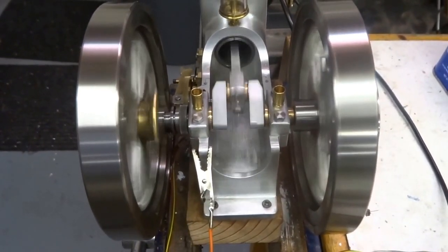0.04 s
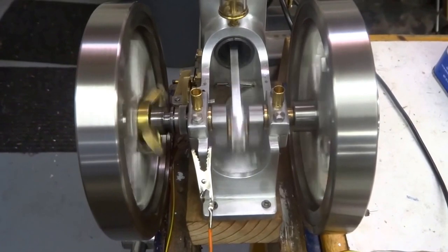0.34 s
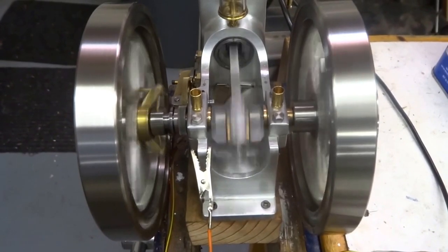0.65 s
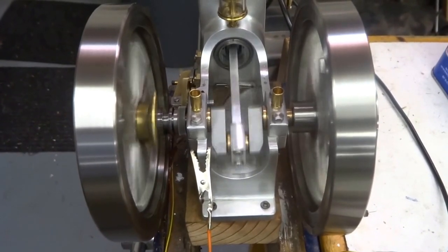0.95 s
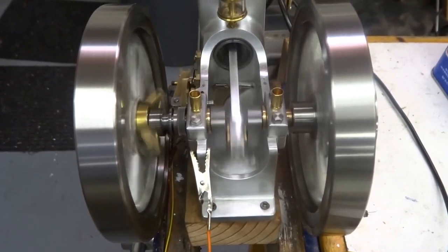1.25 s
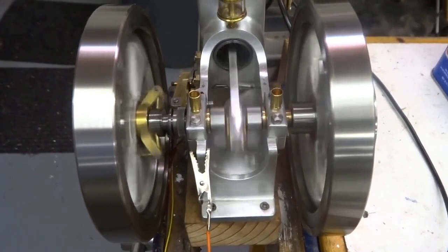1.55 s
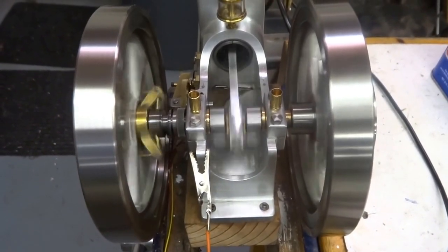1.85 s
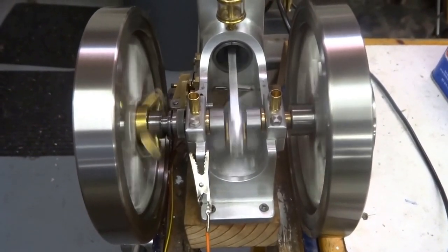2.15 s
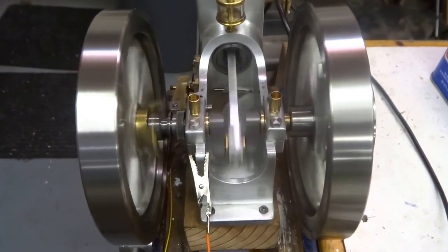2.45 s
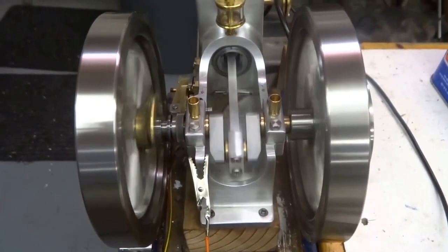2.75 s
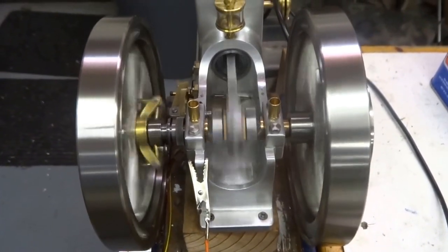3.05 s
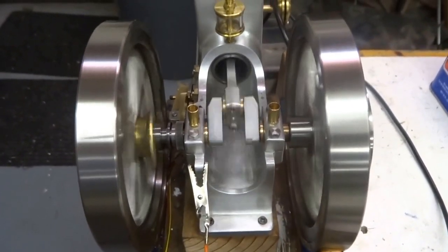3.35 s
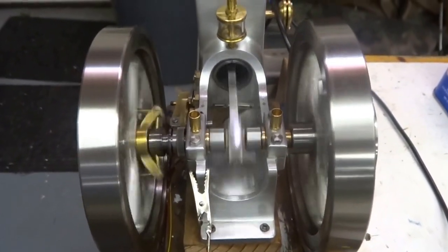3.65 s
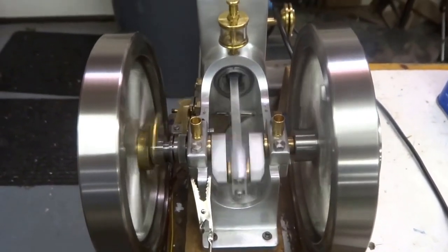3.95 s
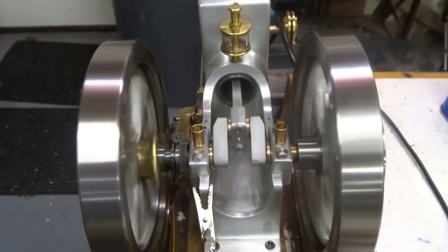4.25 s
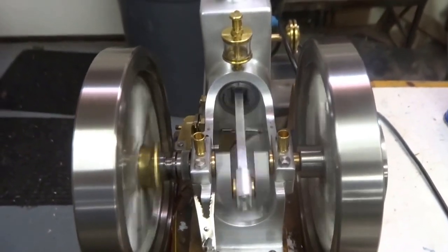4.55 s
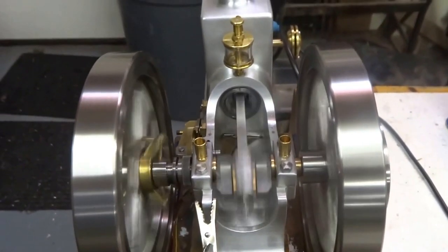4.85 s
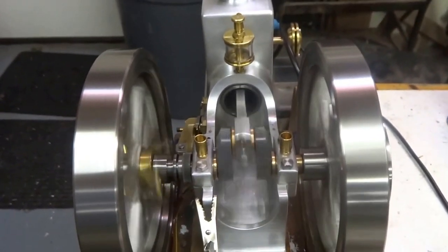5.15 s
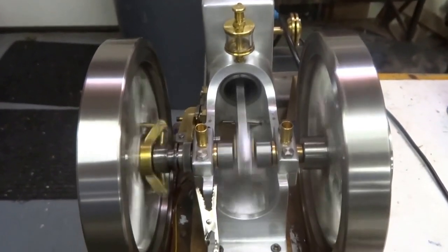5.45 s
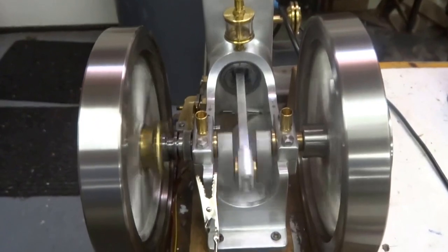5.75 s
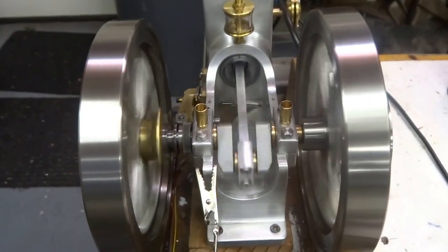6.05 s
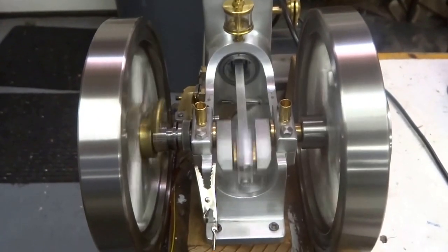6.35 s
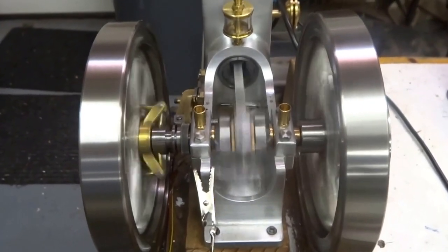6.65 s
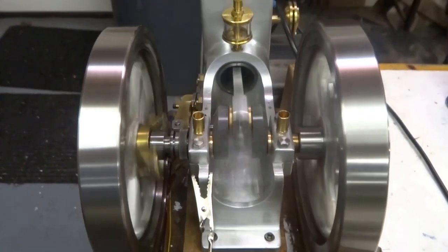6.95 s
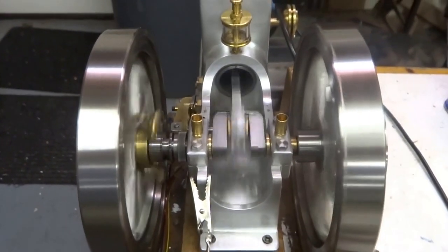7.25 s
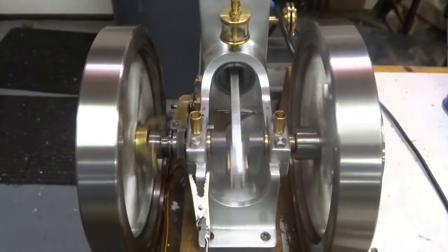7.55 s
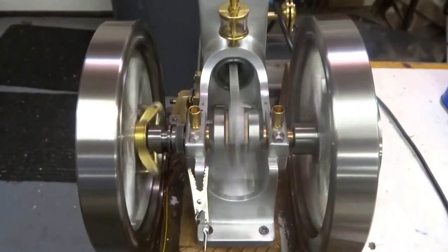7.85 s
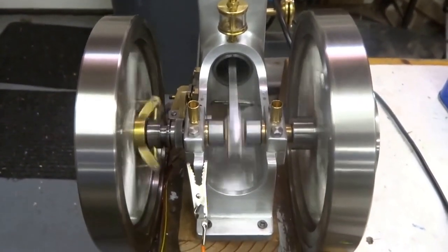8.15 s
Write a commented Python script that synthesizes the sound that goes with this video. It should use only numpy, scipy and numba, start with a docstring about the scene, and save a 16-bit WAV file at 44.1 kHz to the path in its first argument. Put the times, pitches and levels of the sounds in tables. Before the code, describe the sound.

Fast, steady metal clatter and pulsing air from a model flywheel engine, broken by occasional sucking hisses, chuffs and soft misfires.

```python
"""A small hit-and-miss model engine turns about 13 times a second, close up in a workshop.
At 0.6 s its mixer sucks with a hiss and it fires with a chuff. Then it coasts, exhaust valve held open:
the piston pumps air that whistles in and out, and loose metal parts clatter. At 4 s the wooden base
takes a dull blow; the slowed engine misfires twice, then fires at 4.6 s and 5.7 s. It coasts again and
ends on three misfires near 8 s. Each time the valve shuts for an intake, whistle and clatter duck."""
import sys
import numpy as np
from scipy import signal
from scipy.fft import rfft, irfft
from scipy.io import wavfile
from scipy.ndimage import uniform_filter1d
from numba import njit

SR = 44100
rng = np.random.default_rng(int(sys.argv[2]) if len(sys.argv) > 2 else 0)


def wrap_up_sound(samples):
    """Save the sound to the file named by the first command line argument, as 16-bit audio."""
    columns = np.atleast_2d(samples).T
    # keep every value between -1 and 1, then stretch to whole-number steps
    tamed = np.clip(columns, -1, 1)
    steps = np.round(tamed * 32767).astype(np.int16)
    wavfile.write(sys.argv[1], SR, steps)


N = 365588
T = np.arange(N) / SR


def undb(db):
    """Decibels to gain."""
    return 10 ** (np.asarray(db) / 20)


def noise():
    """White noise of unit power."""
    return rng.standard_normal(N)


def unit(x):
    """Scale to unit power."""
    return x / np.sqrt(np.mean(x ** 2))


def through(x, response):
    """Pass a sound through a response scaled to unit energy."""
    return signal.fftconvolve(x, response / np.linalg.norm(response))[:N]


def colour(x, spectrum, size=4096):
    """Minimum-phase EQ; the curve sets the tone, not the overall level."""
    hz, db = np.transpose(spectrum)
    log_hz = np.log(np.maximum(np.arange(size // 2 + 1) * SR / size, 1))
    cepstrum = irfft(np.log(undb(np.interp(log_hz, np.log(hz), db))))
    cepstrum[1:size // 2] *= 2
    cepstrum[size // 2 + 1:] = 0
    return through(x, irfft(np.exp(rfft(cepstrum))))


def ring(x, modes, size=6000):
    """Excite a set of decaying modes; the narrow ones ring longest."""
    t = T[:size]
    response = sum((-1) ** k * undb(db) * width * np.exp(-np.pi * width * t) * np.sin(2 * np.pi * hz * t)
                   for k, (hz, width, db) in enumerate(modes))
    return through(x, response)


def bursts(times, dbs, rise, hold, t60, size=16000):
    """Envelope of bursts that rise, hold and die away, timed in seconds."""
    t, envelope = T[:size], np.zeros(N + size)
    for start, db, held in np.broadcast(times, dbs, hold):
        i = int(np.clip(start * SR, 0, N))
        decay = np.exp(-np.log(1000) * np.maximum(t - held, 0) / t60)
        envelope[i:i + size] += undb(db) * np.minimum(t / rise, 1) * decay
    return envelope[:N]


def wander(rate_hz):
    """Smooth, bounded random drift with a spread near 1."""
    step = max(int(SR / rate_hz), 1)
    stairs = np.repeat(rng.standard_normal(N // step + 1), step)
    return 2 * np.tanh(unit(uniform_filter1d(stairs, step)[:N]) / 2)


def gate(spans):
    """Soft-edged gate, 1 from each start to its end in seconds."""
    return uniform_filter1d(sum(1. * ((T > start) & (T < end)) for start, end in spans), size=400)


@njit
def bandpass(x, hz, width):
    """Band-pass whose centre moves."""
    y, band_state, low_state = np.empty(len(x)), 0., 0.
    for i in range(len(x)):
        g, damping = np.tan(np.pi * hz[i] / SR), width / hz[i]
        band = (band_state + g * (x[i] - low_state)) / (1 + g * (g + damping))
        band_state, low_state = 2 * band - band_state, low_state + 2 * g * band
        y[i] = damping * band
    return y


def whistle(hz, width_hz):
    """Noise that sings in a narrow, moving resonance."""
    breathy = bandpass(noise(), hz, float(width_hz))
    return unit(bandpass(breathy, hz, float(width_hz)))


def pan(x, right_db):
    """Place a sound in stereo, the right side louder by right_db."""
    return x * undb(np.array([[-1], [1]]) * right_db / 2)


def reflections(x, t60=0.065, size=16000):
    """A short diffuse tail, different at each ear."""
    t = T[:size]
    tail = np.minimum(t / 0.0019, 1) * np.exp(-np.log(1000) * t / t60)
    return np.array([through(x, rng.standard_normal(size) * tail) for _ in range(2)])


# The tone of the walls. Each row: frequency in Hz, relative level in dB.
WALL_EQ = [(100, -5), (450, 7.5), (1100, 10), (2000, -1), (4500, 10), (8000, 3.5), (13000, -12)]
def workshop(engine, air):
    """A tight room: the walls colour the engine's reflections and return its whistle plain."""
    return undb(-17) * reflections(colour(engine, WALL_EQ)) + undb(-19) * reflections(air.mean(axis=0))


# The tones of the base's drone and of a blow on it. Each row: frequency in Hz, relative level in dB.
DRONE_EQ = [(25, -45), (60, -15), (105, -13), (138, -1), (185, -6.5), (300, -12), (500, -6.5), (900, -7.5),
            (3000, -9.5), (14000, -23)]
BUMP_EQ = [(100, -12), (300, -3), (800, 0), (1300, -4), (3000, -15), (12000, -26)]
def wooden_base(bump_s=4.002, bump_db=-20.5):
    """The wooden base drones along and takes one dull blow."""
    blow = noise() * bursts([bump_s], bump_db, rise=0.00022, hold=0.0012, t60=0.028)
    drone = colour(noise(), DRONE_EQ) * undb(-40 + 3.4 * wander(11))
    return drone + colour(blow, BUMP_EQ)


def squeak(turns, at_turn=0.7, half_width_turns=0.07):
    """A sliding part chirps faintly at the same place in every turn."""
    offset = (turns - at_turn + .5) % 1 - .5
    swell = np.exp(-(offset / half_width_turns) ** 2)
    return whistle(hz=7700 * (1 + 0.008 * wander(40)), width_hz=450) * swell * undb(-41)


# Firings push the tempo, misfires drag it. Each row: time in seconds, speed change in turns a second.
SPEED_KICKS = [(0.719, 1.918), (4.264, -0.1585), (4.434, -0.1585), (4.61, 1.305), (5.736, 1.21),
               (7.932, -0.1585), (8.101, -0.1585)]
def flywheels(start_turns=0.6126, start_speed=12.4554, friction=0.5627):
    """Speed in turns a second and angle in turns: friction slows the wheels, firings kick them on."""
    speed = start_speed - friction * T + sum(kick * (T > time) for time, kick in SPEED_KICKS)
    return speed, start_turns + np.cumsum(speed) / SR


# The two notes of the open port. Each row: pitch in Hz, width in Hz, pitch rise at full flow in Hz,
# outward level in dB, inward level in dB, pan to the right in dB.
PORT_NOTES = [(4420, 545, 71, -25.5, -32, 4.5), (2856, 396, 190, -32, -26, 0.5)]
def pumping(turns, dead_centre_turns=0.616, flow_power=1.7, leak=0.052):
    """The piston pumps air through the open valve: the high note leads going out, the low coming in."""
    piston_speed = np.sin(2 * np.pi * (turns - dead_centre_turns))
    flow = np.abs(piston_speed)
    outward = (1 + np.tanh(4 * piston_speed)) / 2
    air = 0
    for hz, width, rise_hz, out_db, in_db, right_db in PORT_NOTES:
        note = whistle((hz + rise_hz * flow) * (1 + 0.013 * wander(40)), width)
        db = in_db + (out_db - in_db) * outward + 1.24 * wander(13) + 1.0 * wander(300)
        air = air + pan(note * (leak + flow ** flow_power) * undb(db), right_db)
    return air


# Where parts slide in the cam round, which lasts two turns. Each row: angle in turns,
# half width in turns, bright rattle in dB, frame rattle in dB.
SLIDE_SWELLS = [(0.07, 0.099, -33, -37), (0.91, 0.23, -28, -33.5), (1.1, 0.1, -37.5, -30.5),
                (1.66, 0.17, -59, -36.5), (1.87, 0.15, -26, -28)]
def sliding(turns, bright_floor_db=-39.5, frame_floor_db=-40):
    """Gains of the bright rattle and the frame rattle: a steady bed that swells where parts slide."""
    bright_power, frame_power = undb(bright_floor_db) ** 2, undb(frame_floor_db) ** 2
    for angle, half_width, bright_db, frame_db in SLIDE_SWELLS:
        offset = (turns - angle + 1) % 2 - 1
        swell = np.exp(-(offset / half_width) ** 2)
        bright_power = bright_power + swell * undb(bright_db) ** 2
        frame_power = frame_power + swell * undb(frame_db) ** 2
    return np.sqrt([bright_power, frame_power])


# The groove of rod, cam and latch in each cam round. Each row: angle in turns, scatter in turns,
# chance from 0 to 1, chatter length in seconds, bright contact in dB, frame in dB, own note in Hz.
CAM_KNOCKS = [(0.03, 0.0087, 0.5, 0.0094, -21.5, -32.5, 1400),
              (0.105, 0.0106, 0.75, 0.003, -27.5, -25, 1790), (0.18, 0.013, 0.4, 0.011, -30, -25, 1600),
              (0.335, 0.008, 0.25, 0.0024, -28, -34, 1800), (0.42, 0.0055, 0.8, 0.003, -33.5, -24, 1600),
              (0.79, 0.044, 0.9, 0.004, -28, -35, 1400), (0.93, 0.03, 0.45, 0.0097, -24.5, -28.5, 1400),
              (0.99, 0.019, 0.55, 0.0015, -25, -37, 1460), (1.035, 0.008, 0.75, 0.0018, -24, -31, 2660),
              (1.10, 0.0072, 0.9, 0.004, -27.5, -24, 1910), (1.225, 0.021, 0.45, 0.0097, -25, -30.5, 1660),
              (1.33, 0.063, 0.4, 0.0094, -25, -26, 1570), (1.42, 0.0033, 0.8, 0.003, -34, -35, 1620),
              (1.592, 0.0017, 1, 0.0025, -29, -26, 2840), (1.91, 0.0064, 1, 0.0025, -22, -30.5, 2360),
              (1.975, 0.011, 0.6, 0.001, -37, -18, 1310)]
# The accents, as the rod's play is taken up at once or the latch drops.
# Each row: start in seconds, length in seconds, bright contact in dB, frame in dB.
HARD_CLACKS = [(0.186, 0.0056, -17, -35), (0.199, 0.0034, -20, -17), (0.432, 0.013, -20, -21),
               (0.597, 0.013, -20.5, -22.5), (0.825, 0.0024, -20, -21.5), (0.967, 0.016, -18, -27),
               (1.1, 0.0035, -22, -24), (1.112, 0.024, -20, -25), (1.197, 0.004, -19, -22),
               (1.268, 0.0044, -19, -26), (1.405, 0.0087, -17, -25), (1.703, 0.011, -17, -23.5),
               (1.842, 0.0036, -31, -32), (2.08, 0.0074, -20, -23), (2.168, 0.0032, -16, -21),
               (2.301, 0.017, -17.5, -30), (2.387, 0.021, -19, -22.5), (2.474, 0.0069, -19, -21.5),
               (2.597, 0.003, -18, -23), (2.707, 0.0025, -16, -14), (2.864, 0.011, -18.5, -20.5),
               (3.085, 0.015, -22.5, -28), (3.165, 0.0045, -18, -19), (3.23, 0.0047, -21, -26),
               (3.39, 0.006, -22, -24), (3.404, 0.0068, -21, -18.5), (4.114, 0.002, -32, -28),
               (4.135, 0.004, -25, -30), (4.173, 0.002, -16, -22), (4.304, 0.013, -19.5, -21),
               (4.479, 0.0075, -17.5, -24), (4.549, 0.007, -25, -26), (4.57, 0.019, -26.5, -27),
               (4.886, 0.0062, -20, -22), (5.285, 0.0062, -18.5, -19.5), (5.362, 0.0034, -18.5, -16.5),
               (5.523, 0.0097, -20, -20.5), (5.609, 0.013, -18.5, -20.5), (5.845, 0.0031, -25, -33),
               (5.92, 0.0051, -22, -38), (6.222, 0.0045, -16.5, -21), (6.534, 0.0031, -19.5, -23),
               (6.613, 0.0063, -19.5, -19.5), (6.692, 0.0048, -20.5, -17.5), (6.91, 0.017, -25.5, -25.5),
               (7.08, 0.011, -20, -20), (7.399, 0.014, -20.5, -22), (7.727, 0.0064, -19.5, -21),
               (7.869, 0.0024, -16.5, -22), (7.98, 0.0079, -19.5, -20), (8.144, 0.0095, -19.5, -25)]
# The cam hits the shut valve's rod: length in seconds, bright contact in dB, frame in dB, note in Hz.
VALVE_LIFT = (0.0025, -29, -25.5, 2200)
def knocks(turns, drive_db, spread_db=1.6, clack_hz=1690, lift_turns=1.425):
    """Every metal hit in time order, as rows of start, length, bright level, frame level and note."""
    rounds = np.arange(0, turns[-1], 2)
    angle, scatter, chance, length, bright_db, frame_db, hz = np.tile(CAM_KNOCKS, (len(rounds), 1)).T
    late, force, tone, stretch = rng.standard_normal((len(angle), 4)).T
    start = np.interp(np.repeat(rounds, len(CAM_KNOCKS)) + angle + scatter * late, turns, T)
    hit_drive_db = np.interp(start, T, drive_db)
    force_db = hit_drive_db + spread_db * force
    groove = np.column_stack([start, length * np.exp(0.14 * stretch), bright_db + force_db,
                              frame_db + force_db + 1.65 * tone, hz])
    clacks = np.array([(*row, clack_hz) for row in HARD_CLACKS])
    before, after = start[:, None] < clacks[:, 0] - 0.016, start[:, None] > clacks[:, 0] + clacks[:, 1]
    clear_of_clacks = np.all(before | after, axis=1)
    # the harder the engine is driven, the more often its loose parts strike
    strikes = rng.random(len(start)) < chance ** (1 / undb(hit_drive_db))
    played = strikes & clear_of_clacks & (start > 0) & (start < T[-1])
    working_rounds = np.interp([opens for _, opens, *_ in WORKING_CYCLES], T, turns) // 2
    lifts = [(time, *VALVE_LIFT) for time in np.interp(2 * working_rounds + lift_turns, turns, T)]
    hits = np.vstack([groove[played], clacks, lifts])
    return hits[np.argsort(hits[:, 0])]


# The clank of the frame, the ping of small parts and the thin two-note ring of a steel piece.
# Each row: pitch in Hz, width in Hz, relative level in dB.
FRAME_MODES = [(357.3, 11.8, -3.5), (480, 23, -9), (663, 16.5, -1), (800, 28, -3), (1112, 63, 1.5),
               (1250, 70, 0), (1419, 69, 5), (1762, 187, -1.5), (2018, 47, 6), (2396, 645, -0.5),
               (2750, 680, -10.5)]
PART_MODES = [(4650, 580, 1.5), (5840, 22, -35), (8050, 205, 0), (9750, 130, 3.5), (10800, 27, -24)]
STEEL_MODES = [(12260, 110, 0), (12612, 110, -3)]
# The click of metal on metal. Each row: frequency in Hz, relative level in dB.
CONTACT_EQ = [(100, -16), (400, -13.5), (900, -4.5), (1500, -4.5), (2700, 3), (3700, -2.5), (4700, 6.5),
              (6000, 3), (9000, 0.5), (11000, 2.5), (14000, -2), (15500, -19.5)]
def clatter(turns, drive_db, flight_s=0.0061, flight_db=-3, note_width_hz=180.0):
    """Each knock is a chatter of contacts, with a finer rattle between. Both ring frame and parts."""
    start, length, bright_db, frame_db, hz = knocks(turns, drive_db).T
    bright_rattle, frame_rattle = sliding(turns) * undb(drive_db)
    chatter = noise() * undb(1.9 * wander(1500))
    # just before a knock the part flies free and the rattle drops
    next_knock = np.searchsorted(start, T)
    wait_s = start[np.minimum(next_knock, len(start) - 1)] - T
    rattle = noise() * undb(4.7 * wander(350) + flight_db * np.exp(-(wait_s / flight_s) ** 2))
    blows = chatter * bursts(start, frame_db, rise=0.0005, hold=length, t60=0.02, size=4000)
    first_contact = bursts(start, bright_db - 4, rise=0.0001, hold=0.0004, t60=0.009, size=4000)
    bounces = bursts(start, bright_db, rise=0.0002, hold=length, t60=0.028, size=4000)
    bright = chatter * (first_contact + bounces) + rattle * bright_rattle
    parts = undb(-10.5) * ring(bright, PART_MODES)
    steel = undb(-9.0) * ring(bright * undb(3 * wander(40)), STEEL_MODES)
    frame = undb(-2.11) * ring(blows + rattle * frame_rattle, FRAME_MODES)
    note_hz = hz[np.maximum(next_knock - 1, 0)]  # each knock rings briefly with its own note
    note = bandpass(blows, note_hz, note_width_hz) * np.sqrt(SR / np.pi / note_width_hz)
    return undb(-2.5) * colour(bright, CONTACT_EQ) + parts + steel + frame + undb(-6) * note


# The engine's breaths, in and out. Each row: intake start in seconds, exhaust opening in seconds,
# then the relative levels of intake hiss, intake snort, exhaust chuff and low puff in dB.
WORKING_CYCLES = [(0.614, 0.719, -19, -32, -21.5, -35), (4.173, 4.264, -27, -26, -60, -26.5),
                  (4.327, 4.434, -19, -43, -60, -29), (4.500, 4.61, -19.5, -47, -21, -37),
                  (5.629, 5.736, -19, -38.5, -22, -34), (7.869, 7.932, -41, -24.5, -60, -29.5),
                  (7.994, 8.101, -20, -47, -63.5, -28), (8.164, 8.272, -18, -52, -45, -29.5)]
# The airy hiss and the throaty snort. Each row: frequency in Hz, relative level in dB.
HISS_EQ = [(200, -26), (1000, -30), (3000, -8.5), (4800, -16), (6500, -7.5), (8500, 0.5), (10000, 2),
           (11800, 1.5), (13500, -6), (15500, -28)]
SNORT_EQ = [(60, -16), (140, -7), (350, -18), (600, -2.5), (850, -3), (1300, -3), (1900, -10.5),
            (4000, -19), (12000, -23)]
# The ring of the mixer throat. Each row: pitch in Hz, width in Hz, relative level in dB.
THROAT_MODES = [(6160, 92, 0), (8060, 210, -12), (10500, 110, 2.5), (10800, 130, -2), (12100, 190, -2)]
def intake(flutter_hz=115):
    """The piston sucks through the mixer, whose sprung valve flutters and chops the hiss."""
    start, _, hiss_db, snort_db, _, _ = np.transpose(WORKING_CYCLES)
    flutter_phase = 2 * np.pi * np.cumsum(flutter_hz * (1 + 0.15 * wander(90))) / SR
    flutter = undb(4.4 * np.sin(flutter_phase))
    jet = noise() * flutter * bursts(start, hiss_db, rise=0.0024, hold=0.027, t60=0.15)
    snort = noise() * flutter * bursts(start, snort_db, rise=0.0028, hold=0.023, t60=0.19)
    return undb(-1) * colour(jet, HISS_EQ) + undb(-6) * ring(jet, THROAT_MODES) + colour(snort, SNORT_EQ)


# The bright chuff and the thump under it. Each row: frequency in Hz, relative level in dB.
CHUFF_EQ = [(200, -7.5), (600, -10), (1200, -25), (3000, -8), (4500, -6.5), (6500, -1), (10000, 3),
            (12500, -8), (15500, -13)]
THUMP_EQ = [(30, -26), (60, -18), (90, -11.5), (120, 4.5), (170, -4), (260, -16.5), (550, -37), (1000, -6),
            (4000, -59)]
# The pipe's ring and the wooden base's boom. Each row: pitch in Hz, width in Hz, relative level in dB.
PIPE_MODES = [(6130, 280, -0.82), (6290, 190, -0.15), (8260, 120, -1), (9600, 91, -1)]
BASE_MODES = [(122.4, 18, 3), (139, 6.2, 2), (238, 53, -14.5), (538, 20, -8)]
def exhaust(puff_hz=150):
    """The valve cracks open: burnt gas spits, hisses and thumps; a misfire is mostly a low puff."""
    _, opens, _, _, chuff_db, puff_db = np.transpose(WORKING_CYCLES)
    spit = bursts(opens + 0.0017, chuff_db + 6.5, rise=0.0023, hold=0.0032, t60=0.014)
    flow = bursts(opens + 0.003, chuff_db + 3.5, rise=0.012, hold=0.041, t60=0.18)
    jet = noise() * (spit + flow)
    swell = bursts(opens - 0.05, chuff_db - 9.5, rise=0.063, hold=0.1, t60=0.27)
    piston_push = bursts(opens, puff_db - 10.5, rise=0.0023, hold=0.041, t60=0.12)
    shove = noise() * (swell + piston_push)
    thump = undb(-6) * colour(shove, THUMP_EQ) + undb(0.5) * ring(shove, BASE_MODES, size=30000)
    # the puff is one swing of pressure, centred shortly after the valve lifts
    lag = T - opens[:, None] - 0.0125
    swings = np.exp(-(lag / 0.0027) ** 2) * np.sin(2 * np.pi * puff_hz * lag)
    puff = undb(puff_db + 7) @ swings
    return undb(-0.2) * colour(jet, CHUFF_EQ) + undb(-9.5) * ring(jet, PIPE_MODES) + thump + puff


# How loosely the parts rattle, slowly changing over time. Each row: time in seconds, level change in dB.
LOOSENESS = [(0, 0.5), (1.0, -1), (1.6, 1), (2.5, 0.5), (3.8, 0.5), (5.2, -0.5), (6.5, 1), (8.29, -0.5)]
def scene(usual_speed=12.7, loaded_s=0.098):
    """The crank drives air and rattle, which grow with its speed and duck while the valve is shut."""
    speed, turns = flywheels()
    overspeed = speed - usual_speed
    shut = gate((sucks, opens + 0.018) for sucks, opens, *_ in WORKING_CYCLES)
    # after a firing the load holds the parts quiet
    loaded = gate((time, time + loaded_s) for time, kick in SPEED_KICKS if kick > 0)
    air = pumping(turns) * undb(1.6 * overspeed - 20 * shut - 3.1 * loaded)
    loose_db = np.interp(T, *np.transpose(LOOSENESS))
    drive_db = 0.3 * overspeed + loose_db - 15 * shut - 7 * loaded
    metal = clatter(turns, drive_db) + squeak(turns) * undb(drive_db)
    gas = intake() + exhaust()
    direct = pan(wooden_base(), right_db=2.6) + air + metal + gas
    return direct + workshop(metal + gas, air)


def record(dry, low_cut_hz=45, top_hz=15600):
    """The microphone thins the deep bass and the recorder cuts the top."""
    thin = signal.sosfilt(signal.butter(2, low_cut_hz, "high", fs=SR, output="sos"), dry)
    return signal.sosfilt(signal.ellip(8, .2, 70, top_hz, fs=SR, output="sos"), thin)


dry = scene()
out = record(dry)
wrap_up_sound(out)
```